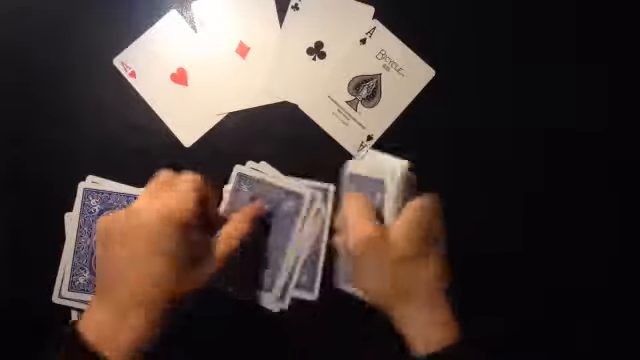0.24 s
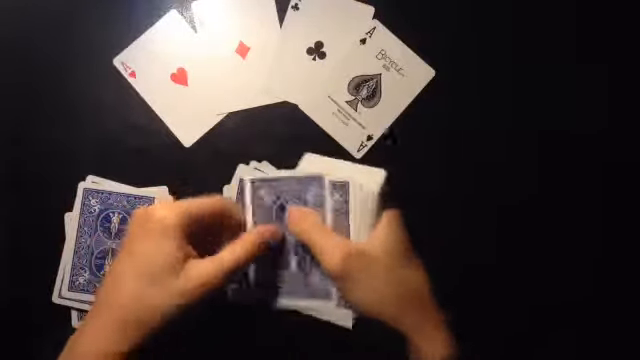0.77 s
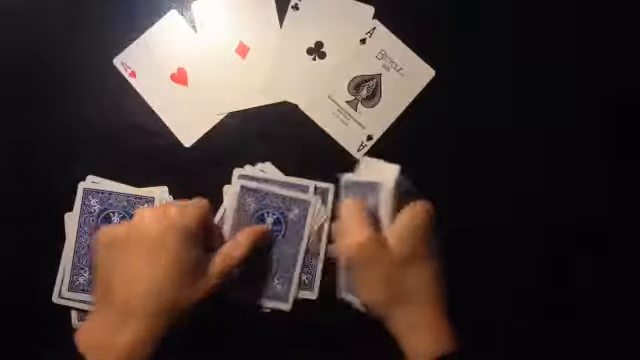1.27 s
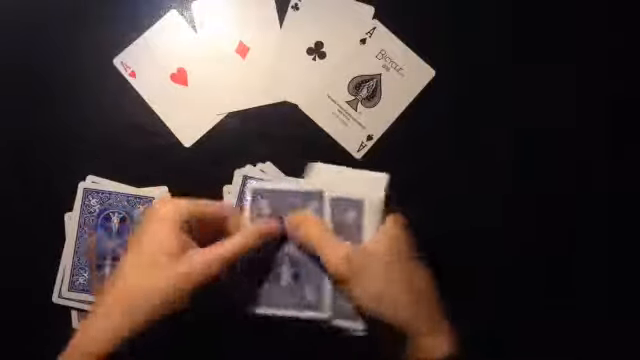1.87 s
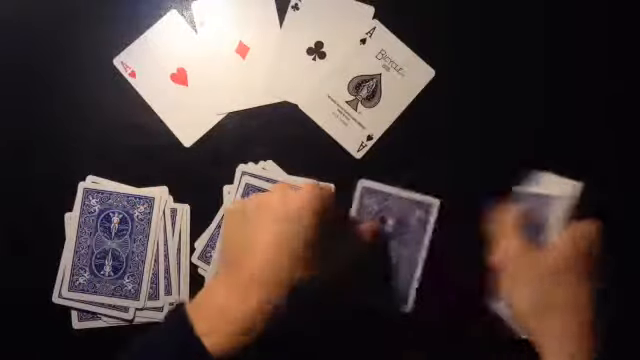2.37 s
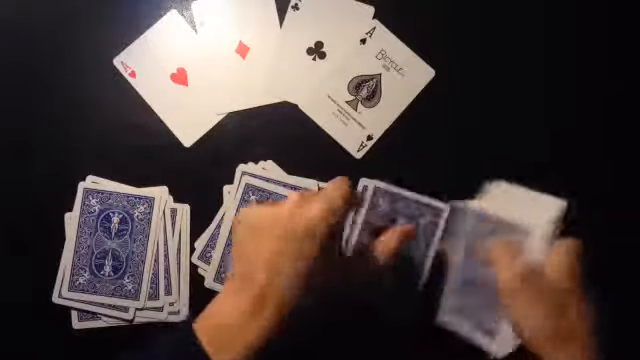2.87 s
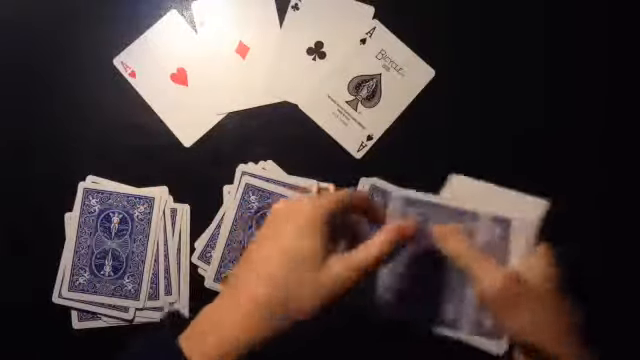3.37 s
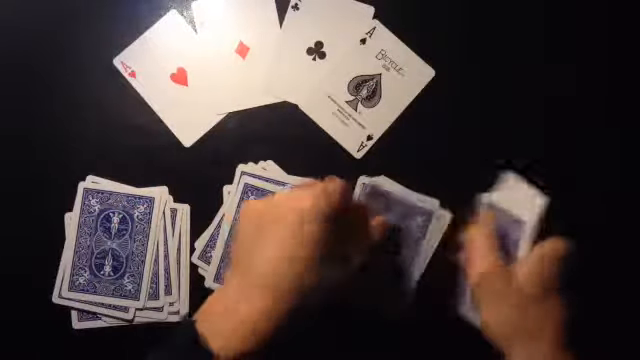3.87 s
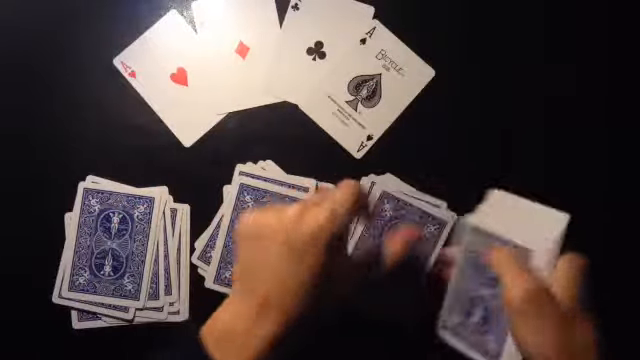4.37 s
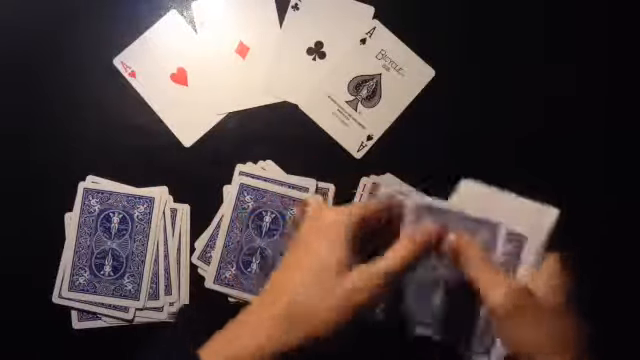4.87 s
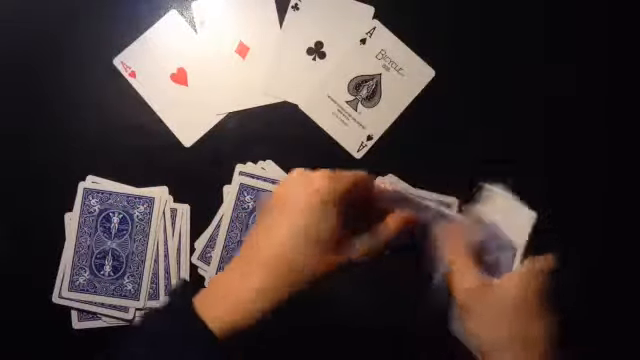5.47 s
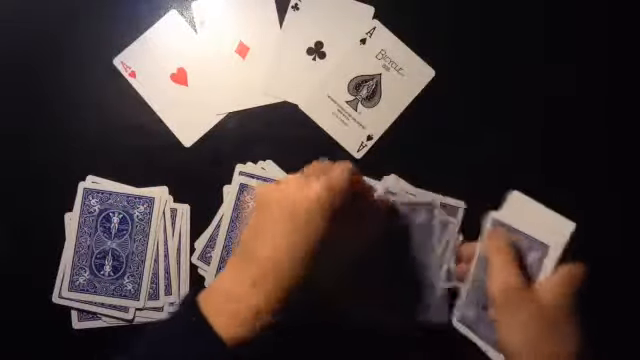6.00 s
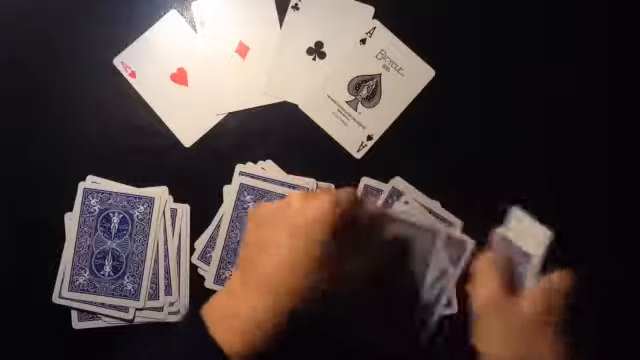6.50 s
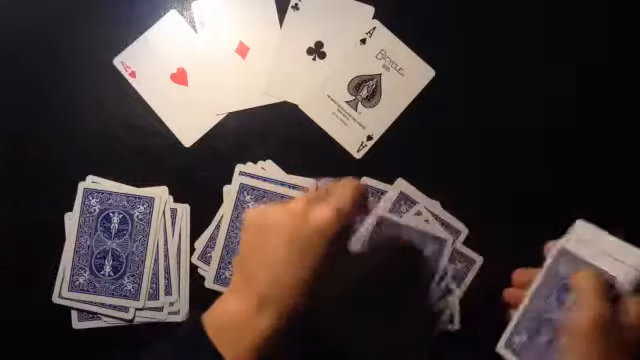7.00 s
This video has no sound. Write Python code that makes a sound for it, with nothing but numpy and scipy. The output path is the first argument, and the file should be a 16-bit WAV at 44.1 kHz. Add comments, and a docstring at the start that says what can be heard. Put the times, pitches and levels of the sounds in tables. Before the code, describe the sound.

Cards are thumbed off a deck one at a time onto piles on a table. Each brings a faint fingertip tick, a brief papery slide rising in pitch, a sharp hollow snap, and a soft low thud through the wood. The pace is steady, nearly three a second, slowing slightly near the end. Close microphone, quiet room, short tail, faint hiss.

```python
"""Playing cards are thumbed one by one from a deck onto a pile on a table, close up in a quiet room.
Per card: a fingertip ticks on the deck (filtered noise burst), the card slides off (friction hiss and a
rising scrape), its edge snaps on the pile (noise ringing an air pocket and the stacked cards), then hand
and cards thud on the table (sagging swing and wood knock). A short room tail follows.
Faint room and microphone hiss runs throughout."""
import sys
import numpy as np
from scipy import signal
from scipy.fft import rfft, irfft, next_fast_len
from scipy.io import wavfile
from scipy.ndimage import uniform_filter1d, map_coordinates

SR = 44100
rng = np.random.default_rng(int(sys.argv[2]) if len(sys.argv) > 2 else 0)


def wav_record(signal):
    """Record a signal, one row per channel, as 16-bit PCM in the file named by sys.argv[1]."""
    frames = np.transpose(np.atleast_2d(signal))
    bounded = np.clip(frames, -1, 1)
    # unit amplitude maps onto the largest positive 16-bit level
    quanta = np.round(bounded * 32767).astype(np.int16)
    wavfile.write(sys.argv[1], SR, quanta)


def voltage_ratio(level):
    """Linear amplitude factor for a level in decibels (scalar or array-like)."""
    return 10 ** (np.asarray(level, float) / 20)


N = 319725
LEAD = SR // 4  # samples ahead of time zero, for events already under way

# card edges snapping onto the pile: time_s, nominal_pocket_hz, pocket_peak_db, upper_peak_db, crackle_peak_db
CARD_SNAPS = [(-0.1, 2001, -2, -18.5, -33.5), (0.2255, 2407, -3, -3, -17.5), (0.5825, 2332, -9, -14.5, -21),
              (0.9592, 2568, -5, -15, -19), (1.3225, 2230, -2.3, -6, -18), (1.6782, 2696, -4, -5, -19.5),
              (2.0205, 2280, -15, -14, -23), (2.4131, 2237, -8, -12.5, -16.5),
              (2.7975, 2020, -1.3, -12.5, -16.5), (3.1695, 2060, -26, -32.5, -36),
              (3.5801, 2182, -10, -14, -13), (3.9405, 2420, -4.3, -12, -16.5),
              (4.3175, 1850, -18, -25.5, -27), (4.6999, 2400, -5.3, -18.5, -19.5),
              (5.1027, 2263, -12, -27.5, -22), (5.5734, 2580, -8, -8.5, -6),
              (6.0777, 2586, -14, -12.5, -11), (6.5547, 2400, -3.3, -10.5, -11.5),
              (6.9594, 2500, -8, -14, -18.5)]
# card edge catching before its snap or flapping after it: time_s, pocket_peak_db, crackle_peak_db
EDGE_BRUSHES = [(0.219, -16, -30), (0.5695, -25, -38), (0.598, -34, -32), (0.99, -40, -35),
                (1.3148, -22, -34), (1.355, -31, -28), (1.6699, -22, -32), (1.7064, -31, -38),
                (2.0175, -24, -22), (2.032, -30, -30), (2.055, -46, -36), (2.424, -28, -24),
                (2.7743, -37, -50), (2.8523, -37, -34), (3.1434, -36, -40), (3.1792, -47, -32),
                (3.6, -38, -32), (3.953, -30, -27), (4.2963, -30, -41), (4.3057, -35, -46),
                (4.3274, -21, -30), (4.3356, -46, -30), (4.672, -28, -33), (4.6908, -32, -37),
                (4.7137, -32, -24), (4.7341, -40, -29), (5.0035, -43, -41), (5.0718, -23, -48),
                (5.1494, -36, -26), (5.1567, -33, -30), (5.547, -24, -42), (5.9967, -33, -40),
                (6.0485, -39, -45), (6.0955, -41, -39), (6.9288, -33, -37), (6.9896, -35, -33)]
# resonances of the stacked cards, before snap() broadens and flattens them: centre_hz, width_hz, gain_db
PILE_MODES = [(1539, 100, -5), (2020, 200, -3.5), (2471, 72, -8.5), (2837, 150, 1.5), (3414, 190, -7),
              (3768, 110, -7.5), (4478, 120, -11.5)]
# card sliding over card: start_s, fastest_s, hiss_db, scrape_db, last_drag_db
CARD_SLIDES = [(0.15, 0.205, -45, -43, -34), (0.515, 0.556, -46, -56, -42), (0.875, 0.938, -42, -48, -33),
               (1.23, 1.295, -52, -51, -48), (1.6, 1.645, -44, -60, -45), (1.95, 2.004, -49, -40, -41),
               (2.35, 2.392, -49, -47, -37), (2.725, 2.775, -50, -40, -39), (3.095, 3.147, -51, -43.5, -50),
               (3.52, 3.553, -45, -43, -37), (3.88, 3.915, -40.5, -41, -39), (4.25, 4.297, -54, -37.5, -43),
               (4.62, 4.672, -38, -36, -50), (5.01, 5.068, -37, -33.5, -47), (5.43, 5.452, -55, -54, -70),
               (5.47, 5.549, -55, -32, -46), (5.865, 5.924, -46, -57, -85), (6.0, 6.05, -64, -47.5, -57),
               (6.48, 6.53, -50, -41, -48), (6.87, 6.934, -44, -37, -43)]
# friction hiss spectrum: freq_hz, relative_density_db
HISS_SPECTRUM = [(120, -50), (200, -29.5), (796, -24.5), (1700, -13), (1860, -27.5), (2080, -8),
                 (2840, -2.5), (7400, -3.5), (14900, -19.5), (16400, -54)]
# fingertip meeting the deck: time_s, peak_db, brightness_db
FINGER_TICKS = [(0.107, -43.5, -21), (0.123, -38, -23), (0.463, -34.5, -18.5), (0.838, -43, -25.5),
                (0.906, -45, 5), (1.172, -32.5, -21), (1.202, -39, -24), (1.233, -35.5, -19),
                (1.56, -42.5, -20), (1.921, -34.5, -18.5), (1.941, -34.5, -15), (2.301, -34, -18),
                (2.695, -38.5, -26), (3.084, -40, -16), (3.474, -37, -21), (3.493, -30, -9),
                (3.822, -47, -22), (3.86, -29, -17), (4.219, -45, -16), (4.233, -36, -17),
                (4.607, -36.5, -15), (4.928, -37, -13.5), (4.948, -45, -14.5), (5.018, -31, -29.5),
                (5.424, -37, -17.5), (5.85, -35, -18), (6.408, -35.5, -11.5), (6.44, -46, -20),
                (6.825, -40.5, -21), (6.847, -41.5, -12)]
# deck knock spectrum below the bright edge: freq_hz, relative_level_db
DECK_SPECTRUM = [(200, -6), (660, 1), (1500, 2), (2900, -8.5), (3700, 3.5), (4900, -8.5), (5600, -7)]
# hand and cards landing on the table: time_s, boom_db, knock_peak_db
TABLE_THUDS = [(-0.03, -38, -63), (0.244, -25, -48), (0.5832, -34, -30), (0.6153, -26.6, -38),
               (0.958, -30, -38), (0.964, -32, -33), (0.9884, -32, -37), (1.3216, -36, -45),
               (1.3362, -30, -34), (1.359, -33, -36), (1.6757, -30, -40), (1.707, -35, -55),
               (2.0181, -37, -25), (2.0373, -24, -38), (2.443, -27, -39), (2.8218, -37, -47),
               (3.212, -31.5, -40), (3.6016, -33, -38), (3.9612, -26.5, -39), (3.9732, -32.5, -41),
               (4.349, -24, -28), (4.7401, -32, -37), (5.072, -45, -34), (5.1352, -25.5, -33),
               (5.1551, -36, -41), (5.5937, -20.5, -30), (6.0791, -33, -40), (6.1127, -32.5, -44),
               (6.5659, -39, -38), (6.607, -41, -49), (6.9836, -28.5, -36)]
# returns of the boom: delay_s, mean_level_re_boom_db
BOOM_RETURNS = [(0.0267, -23), (0.0434, -35), (0.0516, -14.5), (0.067, -18.5), (0.0729, -18.5),
                (0.0887, -27.0), (0.1013, -28)]
# room decay: freq_hz, t60_s
ROOM_DECAY = [(300, 0.27), (800, 0.44), (2100, 0.44), (5500, 0.37), (12000, 0.25)]
# background hiss spectrum: freq_hz, relative_density_db
AIR_SPECTRUM = [(18, -36), (30, -10), (166, -4.5), (241, -9), (531, -12.5), (748, -4), (831, -8.5),
                (1300, -15), (1740, -14.5), (5130, -14.5), (5700, -16.5), (14300, -21), (16400, -37.5)]
# background hiss level: time_s, rms_db
AIR_LEVEL = [(0, -63), (.4, -66), (1.4, -62.5), (2.6, -63), (3.4, -66), (3.7, -62.5), (4.4, -64),
             (5.4, -61), (6.1, -63.5), (7.25, -62)]


def unit(x):
    """Scale to rms 1."""
    return x / np.sqrt(np.mean(x ** 2) + 1e-20)


def peaking(x, db):
    """Scale to a peak level."""
    return voltage_ratio(db) * x / np.abs(x).max()


def along(points, hz):
    """Interpolate (Hz, value) points on a log frequency axis."""
    point_hz, value = np.transpose(points)
    return np.interp(np.log(hz + 1), np.log(point_hz + 1), value)


def filtered(x, response):
    """Apply a complex response of frequency."""
    size = next_fast_len(len(x) + 4096)
    return irfft(rfft(x, size) * response(np.fft.rfftfreq(size, 1 / SR)), size)[:len(x)]


def lowpass(f, corner_hz):
    """First-order lowpass response."""
    return 1 / (1 + 1j * f / corner_hz)


def peak(f, hz, width_hz):
    """Causal resonance of gain 1 at its centre."""
    return 1j * f * width_hz / (hz * hz - f * f + 1j * f * width_hz)


def wobble(knots_per_s):
    """Smooth random curve."""
    knots = rng.standard_normal(int(N * knots_per_s / SR) + 4)
    return map_coordinates(knots, [np.arange(N) * knots_per_s / SR])


def add(track, time_s, sound):
    """Mix a sound into a track that starts LEAD samples early."""
    part = track[LEAD + int(time_s * SR):][:len(sound)]
    part += sound[:len(part)]


def room(sound):
    """Fresh noise tail building up from the walls, each frequency dying at its own speed."""
    hz, t, z = signal.stft(rng.standard_normal(SR // 2), SR, nperseg=256)
    near_walls = 0.74 * (1 - np.exp(-(t / 0.0059) ** 2))
    far_wall = 0.33 / (1 + np.exp((.043 - t) / 0.003))
    decay = voltage_ratio(-60 * t / along(ROOM_DECAY, hz)[:, None])
    tail = signal.istft(z * (near_walls + far_wall) * decay, SR, nperseg=256)[1]
    return signal.fftconvolve(sound, tail / np.linalg.norm(tail))


def snap(pocket_hz, pocket_db, upper_db, crackle_db):
    """The edge flutters on the pile, rings the shrinking air pocket under the card, then settles."""
    t = np.arange(SR // 8) / SR
    # a weaker contact spreads out longer
    rise_s = np.clip(.0016 - .00002 * max(pocket_db, crackle_db), .0005, .006)
    u = t / rise_s
    flutter = voltage_ratio(3.48 * map_coordinates(rng.standard_normal(len(t)), [t * 700]))  # uneven contacts
    blow = flutter * u * np.exp(1 - u)
    settling = flutter * (1 - np.exp(-u)) * voltage_ratio(-8.5 - 60 * t / 0.099)
    push = (blow + settling) * rng.standard_normal((4, len(t)))
    push[0] += 0.25 * blow  # steady part rings the pocket on its own pitch

    def modes(f):
        return 0.65 + sum(voltage_ratio(0.37 * db) * peak(f, hz, 1.6 * width) for hz, width, db in PILE_MODES)

    def pocket_colour(f):
        return modes(f) * (1j * f / (1j * f + .3 * pocket_hz)) ** 2

    swing = [filtered(p, lambda f: lowpass(f, 750) ** 2) for p in push[:2]]
    pitch_hz = pocket_hz * (1.08 - .2 * np.exp(-t / .003))  # rises as the gap closes
    phase = 2 * np.pi * np.cumsum(pitch_hz) / SR
    pocket = filtered(swing[0] * np.cos(phase) + swing[1] * np.sin(phase), pocket_colour)
    upper = filtered(push[2], lambda f: modes(f) * peak(f, 4100, 2200) ** 2)
    crackle = filtered(push[3], lambda f: peak(f, 6200, 5600) ** 2)
    return peaking(pocket, pocket_db) + peaking(upper, upper_db) + peaking(crackle, crackle_db)


def cards():
    """Snaps and lighter edge brushes excite pocket and pile, each with its own room tail."""
    track = np.zeros(N + LEAD)
    contacts = list(CARD_SNAPS)
    for time_s, pocket_db, crackle_db in EDGE_BRUSHES:
        nearest = min(CARD_SNAPS, key=lambda row: abs(row[0] - time_s))
        upper_db = (pocket_db + crackle_db) / 2 - 3
        contacts.append((time_s, .94 * nearest[1], pocket_db, upper_db, crackle_db))
    for time_s, *colour in contacts:
        sound = snap(*colour)
        add(track, time_s, sound)
        add(track, time_s, voltage_ratio(-21) * room(sound))
    return track[LEAD:]


def table():
    """Dull wood knock; the top swings about three times, sagging in pitch, and the boom returns weaker."""
    track, t = np.zeros(N + LEAD), np.arange(SR // 12) / SR

    def wood(f):
        modes = peak(f, 190, 81) - voltage_ratio(1.0) * peak(f, 340, 140) + voltage_ratio(1.5) * peak(f, 790, 490)
        return modes * lowpass(f, 1100)

    # each snap also passes a blow on to the table; its knock follows the pocket level
    passed_on = [(row[0] - .002, -43, -26.5 + .25 * row[2]) for row in CARD_SNAPS if row[0] > 0]
    for time_s, boom_db, knock_db in [*TABLE_THUDS, *passed_on]:
        start_hz = 117.7 * (1 + .03 * rng.standard_normal())
        envelope = (t / .0098) ** 2 * np.exp(2 - 2 * t / .0098)
        swing = envelope * np.sin(2 * np.pi * start_hz * t * (1 - 3.08 * t))
        push = rng.standard_normal(len(t)) * (t * voltage_ratio(-60 * t / .025) + voltage_ratio(-72 - 60 * t / .12))
        knock = peaking(filtered(push, wood), knock_db)
        add(track, time_s, voltage_ratio(boom_db) * swing + knock)
        for delay_s, return_db in BOOM_RETURNS:
            level_db = boom_db + return_db + rng.normal(0, 1.5)
            add(track, time_s + delay_s, voltage_ratio(level_db) * swing)
        add(track, time_s, room(voltage_ratio(-13.5) * knock + voltage_ratio(boom_db - 21) * swing))
    return track[LEAD:]


def strokes():
    """Each slide speeds up, slows, ends on a last drag and fades: hiss dB, scrape dB, gap closed 0-1."""
    still_db, creep_db, scrape_creep_db = -85, -61.5, -69  # no contact; setting off; scrape before it joins
    drag_s, early_s, coast_s, fade_s = .006, .006, .05, .022
    t = np.arange(N) / SR
    hiss_db, scrape_db, closed = np.full(N, float(still_db)), np.full(N, float(still_db)), np.zeros(N)
    for start, fastest, hiss_top_db, scrape_top_db, drag_db in CARD_SLIDES:
        # ends just before the next snap, or after the longest coast
        end = min([fastest + coast_s] + [row[0] - early_s for row in CARD_SNAPS if row[0] > fastest])
        slow_s = max(end - drag_s - fastest, .001)
        slowed = fastest + slow_s
        dragged = slowed + drag_s

        def shape(first_db, knee, knee_db, top_db, sag_db_per_s):
            times = [start - fade_s, start, knee, fastest, slowed, dragged, dragged + fade_s]
            levels = [still_db, first_db, knee_db, top_db, top_db - sag_db_per_s * slow_s, drag_db, still_db]
            return np.interp(t, times, levels)

        knee_db = creep_db + .65 * (hiss_top_db - creep_db)
        hiss = shape(creep_db, (start + fastest) / 2, knee_db, hiss_top_db, 600)
        joins = start + .45 * (fastest - start)
        scrape = shape(scrape_creep_db, joins, scrape_creep_db, scrape_top_db, 350)
        hiss_db = np.maximum(hiss_db, hiss)
        scrape_db = np.maximum(scrape_db, scrape)
        stroke = slice(int(start * SR), int((end + fade_s) * SR))
        rubbed = voltage_ratio(scrape[stroke])
        closed[stroke] = np.cumsum(rubbed) / rubbed.sum()
    return hiss_db, scrape_db, closed


def slides():
    """Friction hiss swells with speed; the gap under the card adds a grainy scrape climbing as it closes."""
    hiss_db, scrape_db, closed = strokes()
    z = signal.stft(rng.standard_normal(N), nperseg=256)[2]
    patches = uniform_filter1d(rng.standard_normal(z.shape), 6, 0)
    patches = unit(uniform_filter1d(patches, 8, 1))  # worn and smooth spots
    rough = signal.istft(z * voltage_ratio(2.5 * patches), nperseg=256)[1][:N]
    hiss = unit(filtered(rough, lambda f: voltage_ratio(along(HISS_SPECTRUM, f))))
    phase = 2 * np.pi * np.cumsum(1500 + 950 * closed) / SR  # Hz
    grain = voltage_ratio(5.5 * wobble(190))
    swing = [filtered(grain * rng.standard_normal(N), lambda f: lowpass(f, 390) ** 2) for _ in range(2)]
    scrape = unit(swing[0] * np.cos(phase) + swing[1] * np.sin(phase))
    return voltage_ratio(hiss_db + 3.1 * wobble(270)) * hiss + voltage_ratio(scrape_db) * scrape


def fingers():
    """Fingertip ticks: a short dry noise knock on the deck with a bright edge."""
    track, t = np.zeros(N + LEAD), np.arange(SR // 10) / SR
    envelope = (1 - np.exp(-(t / .0008) ** 2)) * (voltage_ratio(-60 * t / 0.014) + voltage_ratio(-15 - 60 * t / .08))
    for time_s, peak_db, bright_db in FINGER_TICKS:
        push = rng.standard_normal(len(t)) * envelope
        edge = [(7300, bright_db + 12), (11300, bright_db - 3.5), (15000, bright_db - 9)]
        colour = [*DECK_SPECTRUM, *edge]
        add(track, time_s, peaking(filtered(push, lambda f: voltage_ratio(along(colour, f))), peak_db))
    return track[LEAD:]


def air():
    """Quiet room and the microphone's own hiss: shaped noise with a drifting level."""
    hush = unit(filtered(rng.standard_normal(N), lambda f: voltage_ratio(along(AIR_SPECTRUM, f))))
    return voltage_ratio(np.interp(np.arange(N) / SR, *np.transpose(AIR_LEVEL))) * hush


def scene():
    """All sources at one microphone; slides and ticks share a room tail."""
    rub = slides() + fingers()
    rub_tail = voltage_ratio(-13.5) * room(rub)[:N]
    return (cards() + table() + rub + rub_tail + air())[None]


def band_limit(x):
    """A steep low-pass at the top of the band."""
    return signal.sosfilt(signal.butter(12, 16500, fs=SR, output="sos"), x)


def record(dry):
    """The microphone fades in the deep bass and upper treble; the converter clips at full scale."""
    treble = [(12000, 0), (14500, -1.5), (15300, -6.5), (15800, -24.5), (16500, -48.5), (16700, -90)]  # Hz, dB

    def microphone(f):
        return (1j * f / (1j * f + 30)) ** 1.5 * voltage_ratio(along(treble, f))

    heard = filtered(dry[0], microphone)
    mix = np.clip(heard, -1, 1)[None]
    return band_limit(mix)


dry = scene()
out = record(dry)
wav_record(out)
```